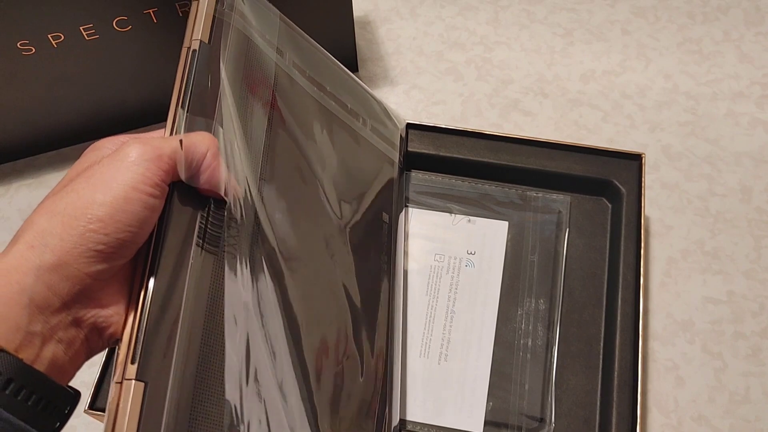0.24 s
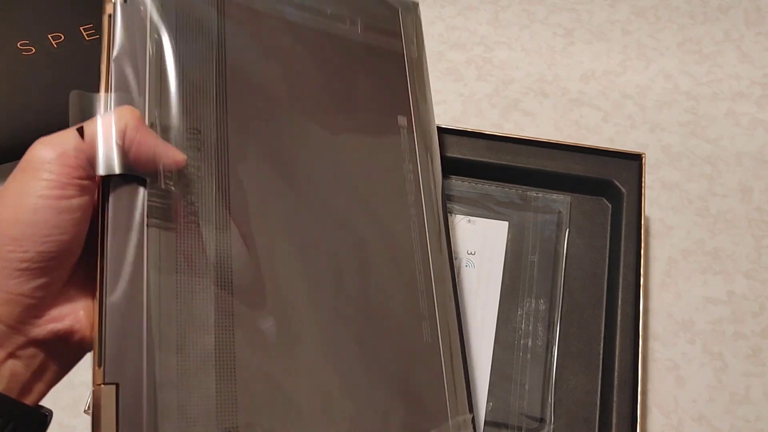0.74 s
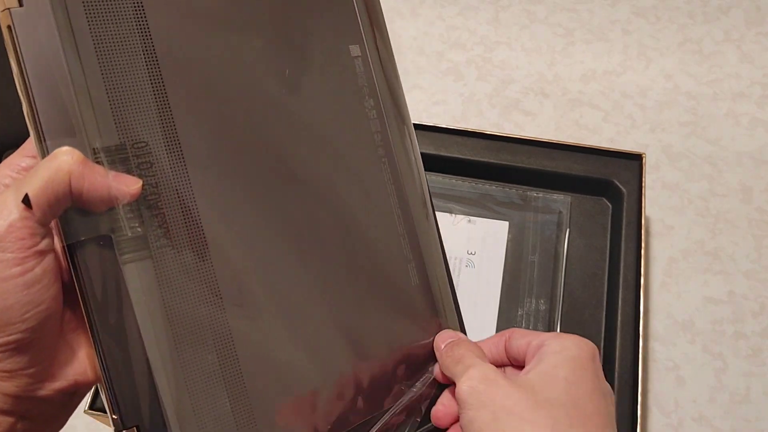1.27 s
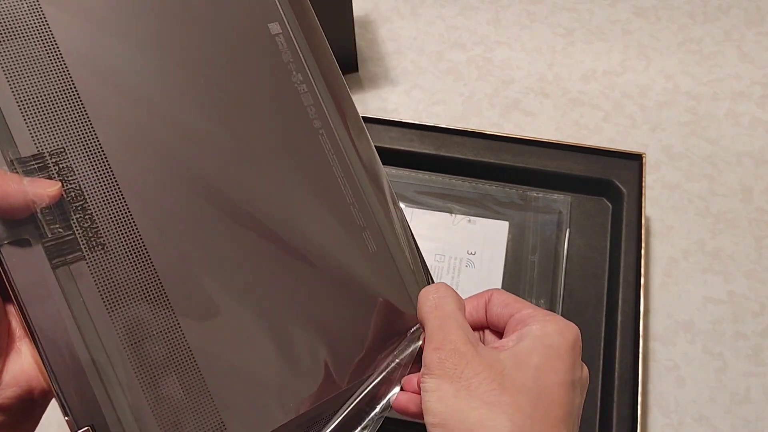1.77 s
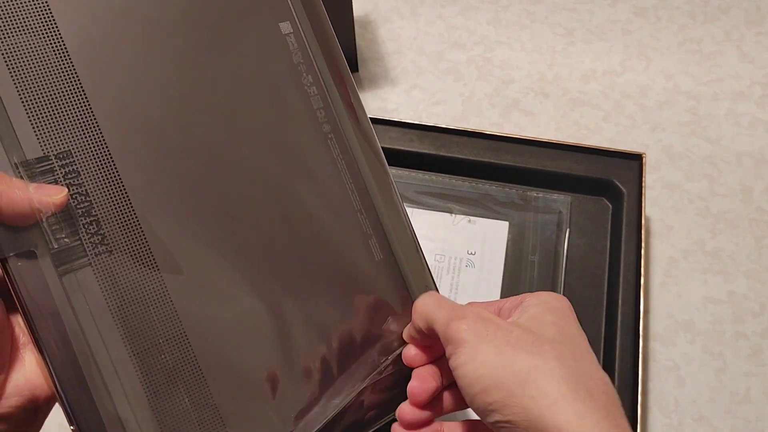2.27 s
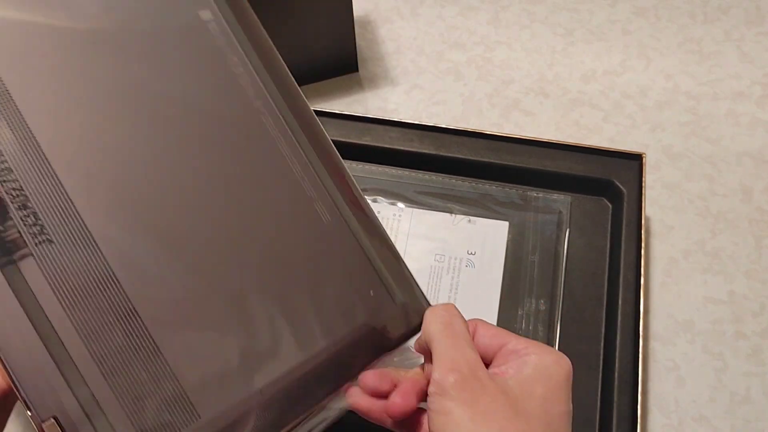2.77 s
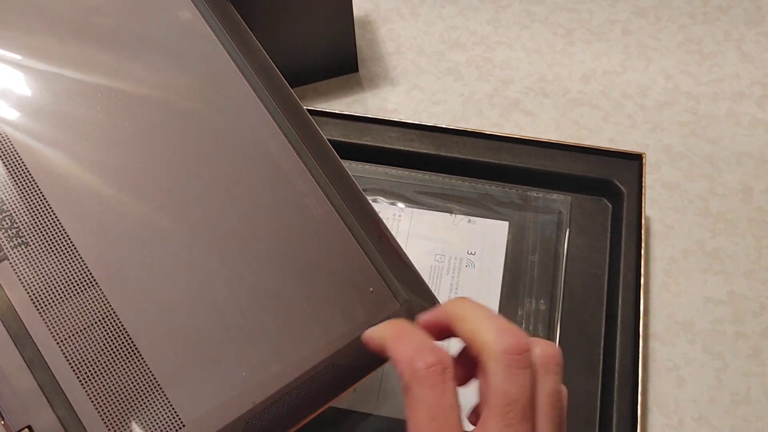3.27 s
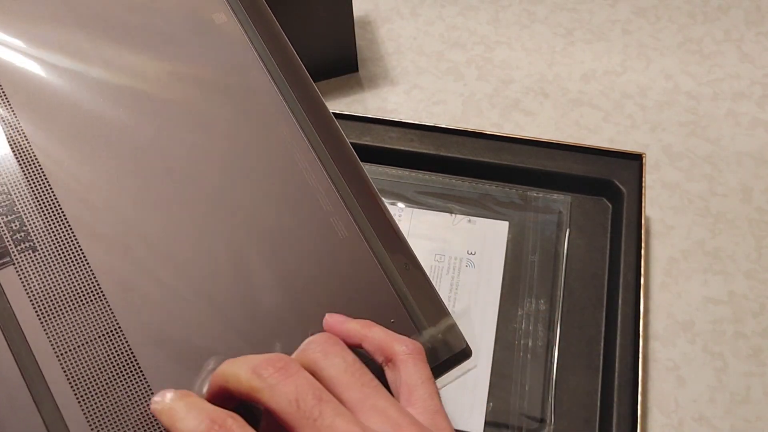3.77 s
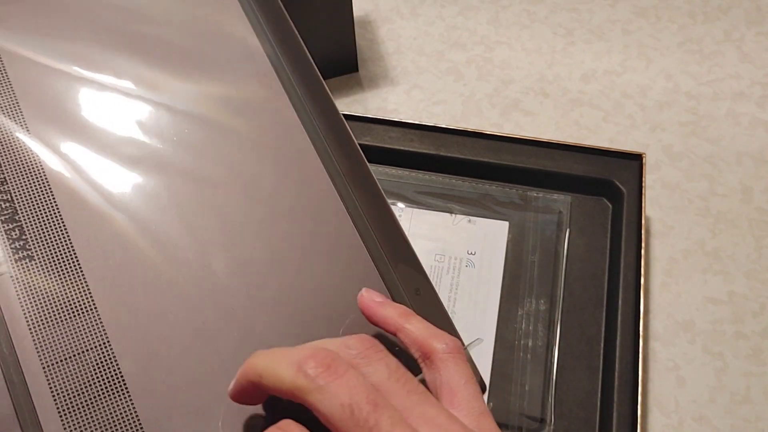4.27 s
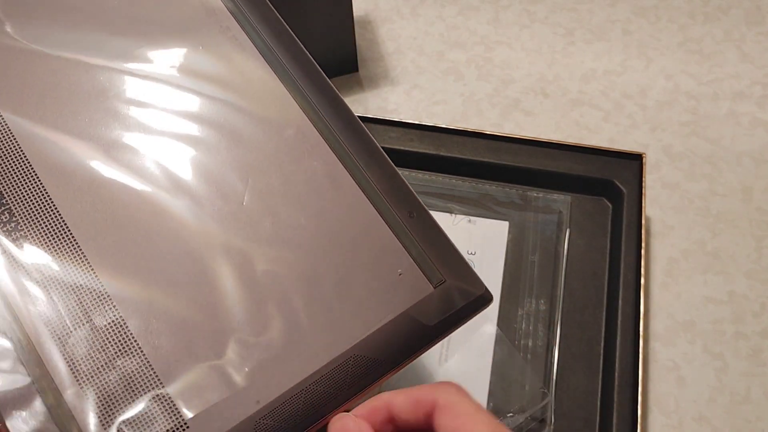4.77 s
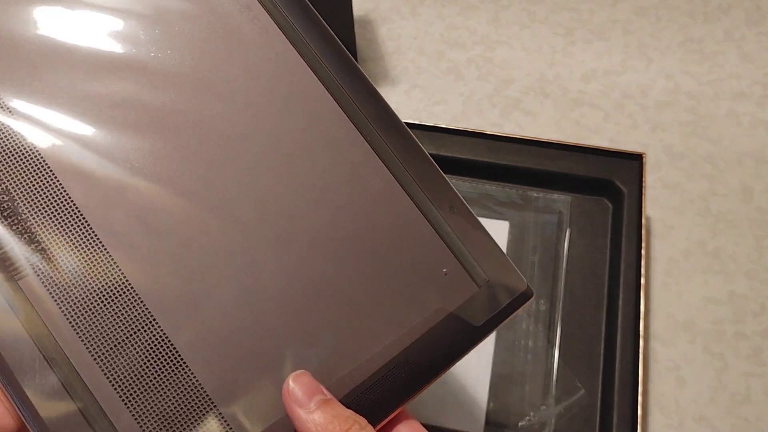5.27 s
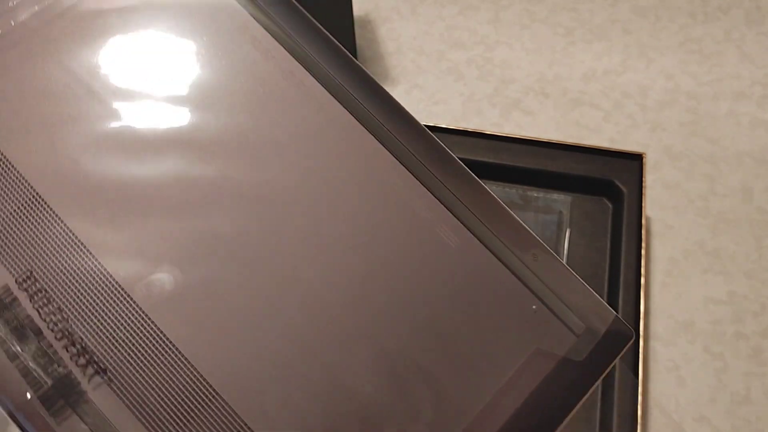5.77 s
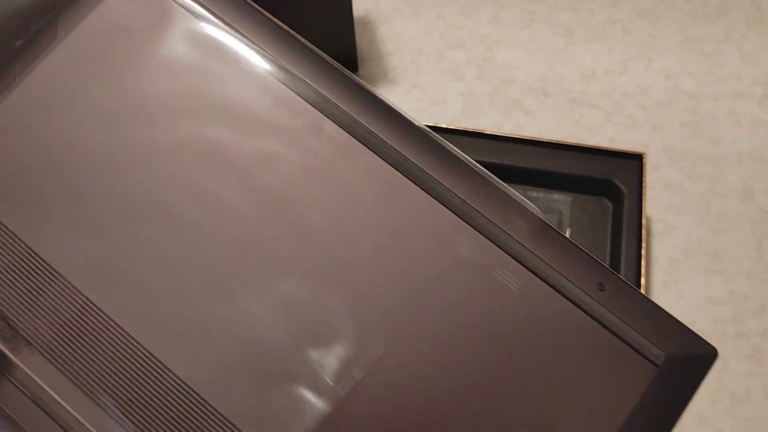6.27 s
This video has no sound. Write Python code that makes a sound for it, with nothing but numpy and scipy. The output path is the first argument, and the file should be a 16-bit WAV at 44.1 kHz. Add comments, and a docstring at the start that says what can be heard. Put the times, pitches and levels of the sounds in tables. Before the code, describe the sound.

Crisp plastic creases snap in tiny click clusters, some bright and papery, others lower and popping. The first second is busiest, then there is a near-silent gap before scattered crackles build again. Fingertips bump the panel dully, most often in the later middle. A last burst of film rustle ends it. Close stereo microphone, short indoor reflections, faint subdued background hiss.

```python
"""Thin plastic film, peeled and slid off a flat panel held over a desk, close to a camera's two microphones.
Its creases snap over as short clusters of clicks, each with its own ring; between them it rustles in fine
grains. Fingers tap the panel, ringing its modes, and three of the biggest snaps each push the air once. A small
dry room answers with desk echoes and a diffuse tail; noise suppression turns down the quiet background."""
import sys
import numpy as np
from scipy import signal
from scipy.fft import rfft, irfft, next_fast_len
from scipy.io import wavfile
from scipy.ndimage import uniform_filter1d, map_coordinates

SR = 44100
rng = np.random.default_rng(int(sys.argv[2]) if len(sys.argv) > 2 else 0)


def file_out(sig):
    """Save sig as 16-bit WAV at sys.argv[1]."""
    # one column per channel
    cols = np.atleast_2d(sig).T
    # limit, then scale
    lim = np.clip(cols, -1, 1)
    pcm = np.round(lim * 32767).astype(np.int16)
    wavfile.write(sys.argv[1], SR, pcm)


N = 287973  # length in samples

# The hand sliding the film in strokes, levels ahead of the room:
# [t/s, length/s, rustle level/dB, slack-sheet flutter level/dB]
STROKES = [(0, .13, -34, -55), (0.191, 0.48, -57, -59), (0.544, 0.19, -54, -67.5),
           (0.951, 0.16, -66, -81.5), (1.486, 0.086, -60.5, -65), (1.75, 0.16, -50.5, -65.5),
           (2.383, 0.22, -51.5, -60.5), (2.827, 0.0083, -38, -50), (2.933, 0.37, -59.5, -57.5),
           (3.553, 0.056, -49, -64.5), (4.464, 0.46, -62.5, -55.5), (4.7, 0.45, -58, -65.5),
           (5.02, 0.2, -48, -58), (5.308, 0.42, -52, -63.5), (5.921, 0.043, -55, -61.5),
           (6.197, 0.11, -35.5, -51), (6.358, 0.059, -45, -56), (6.447, 0.033, -36, -74)]
# Creases snapping over; the thump of the slack sheet is relative to the crack:
# [t/s, strength level/dB, thump level/dB, ring f/Hz]
SNAPS = [(0.0064, -6.5, -12.5, 4540), (0.0659, 0, -1.5, 5540), (0.119, -5, -18.5, 8400),
         (0.1293, 4.5, -1, 1980), (0.1963, -3.5, -7.5, 4130), (0.2618, 1.5, -20, 4930),
         (0.3267, -4.5, -1, 5300), (0.356, -15.5, -22, 3770), (0.5239, -9, -6.5, 1880),
         (0.5509, -4, -21, 1450), (0.618, -0.5, 2, 1190), (0.6773, -10.5, 5.5, 6800),
         (0.8145, 2, -7.5, 1247), (1.484, -24, -7.5, 6650), (1.7408, -10.5, -11, 3120),
         (1.7596, -11.5, -16, 4500), (1.7892, -7.5, -26, 2840), (1.8033, -20, -18, 2900),
         (1.8133, -12, -14, 7000), (1.8817, -9.5, 0, 2300), (1.9592, -8.5, -17, 1050),
         (1.9811, -11, 5, 6500), (2.002, -9.5, -3, 6800), (2.068, -10.5, -3, 2000),
         (2.3651, -10, -3.5, 1460), (2.4115, -14.5, -1, 3500), (2.4427, -10.5, -10.5, 3300),
         (2.4557, -8, -2.5, 4300), (2.525, -15.5, 1.5, 6100), (2.5453, -15.5, 2, 4000),
         (2.6578, -12.5, -16, 3040), (2.6938, -8.5, -5.5, 1960), (2.7229, -1, -9, 3700),
         (2.7404, 1.5, 5, 4000), (2.749, 0.5, -3.5, 3000), (2.898, -16, 19.5, 6100), (2.913, 2, 6.5, 2600),
         (3.059, -10, 3.5, 3940), (3.1536, 0, 5, 1810), (3.195, -13.5, -14.5, 3700),
         (3.2637, -15.5, 15, 3800), (3.489, -17, 10, 1470), (3.5187, -13.5, -19.5, 3580),
         (3.93, -19.5, 7.5, 2720), (4.149, -19.5, 13.5, 2620), (4.6923, -14, 1.5, 3100),
         (4.88, -21.5, 4, 3660), (5.041, -9.5, 6.5, 4550), (5.136, -19, 11, 6500), (5.158, -3.5, 0, 1270),
         (5.219, -15, 7.5, 7300), (5.2691, -15, -3, 3840), (5.3937, -6.5, -2.5, 3500),
         (5.4356, -16.5, -2, 3340), (5.445, -12.5, -1.5, 3900), (5.502, -10.5, -18.5, 5400),
         (5.52, -10.5, -1, 5470), (5.569, -5, -0.5, 3700), (5.593, -1, 0, 2610), (5.6084, 3, 2.5, 3000),
         (5.7174, -10, -11.5, 2200), (5.9787, -16.5, -0.5, 2400), (6.153, -13, -30, 5440),
         (6.191, -0.5, -11, 3015), (6.23, -9.5, -8.5, 5910), (6.4711, 4.5, -18, 2460)]
# Fingers pressing and tapping the panel through the film: [t/s, strength level/dB, ring f/Hz]
TAPS = [(0.128, 8.5, 633), (0.951, -20.5, 741), (1.184, -13, 872), (1.181, -9, 420), (2.327, -7.5, 480),
        (2.972, -0.5, 500), (3.385, -6.5, 596), (3.549, -14.5, 1963), (3.616, -10.5, 1386),
        (3.811, -12.5, 2766), (3.841, -12.5, 1321), (3.874, -15, 1292), (4.025, -11.5, 479),
        (4.049, -7.5, 485), (4.088, -14, 1260), (4.283, -9, 1209), (4.291, -6, 333.5),
        (4.4159, -12.5, 2550), (4.459, -9, 1360), (4.491, -14.5, 749), (4.5456, -13, 2380),
        (4.583, -7, 532), (4.617, 1, 450), (4.682, -8.5, 337), (4.799, -7.5, 316), (4.9, -8, 258),
        (6.12, -10.5, 1900)]
# Low pushes of air from the biggest snaps, peak ahead of the room: [t/s, level/dB]
THUDS = [(2.741, -31.5), (5.157, -32), (6.471, -27)]
# Colour of the film as the microphones hear it: [f/Hz, relative level/dB]
FILM_COLOUR = [(410, -42.5), (700, -1.5), (1440, -1.5), (2080, 0.5), (4900, -0.5), (6900, 1), (7800, -6),
               (10000, 0.5), (15700, -7.5), (16050, -36.5)]
# Low resonances of the slack sheet and panel: [f/Hz, width/Hz, level/dB]
SHEET_MODES = [(322.6, 102, 1.5), (510, 223, 1.5), (819, 680, -3.5)]
# Resonances of the tapped panel: [f/Hz, width/Hz, level/dB]
PANEL_MODES = [(784, 36, 10.5), (1450, 99, 13), (2150, 1100, 4.5), (2900, 150, 6.5)]
# Colour of the background at the microphones: [f/Hz, relative level/dB]
BACKGROUND_COLOUR = [(20, -31.5), (146, -15), (738, -16.5), (1440, -18), (8180, -27.5), (15300, -21),
                     (16300, -66)]
# Colour difference between the two microphone ports: [f/Hz, left-minus-right level/dB]
PORT_LEAN = [(100, -1), (700, 4), (8000, -1)]

# Slopes before, during and after a stroke; each layer scales them by its own steepness
RISE_DB_PER_S, SAG_DB_PER_S, FALL_DB_PER_S = 451, 16, 236.5
RUSTLE_STEEPNESS, FLUTTER_STEEPNESS = 0.88, 0.5  # the slack sheet follows more gently
REST_DB, REST_FLUTTER_DB = -80.5, -72  # the held film never lies quite still

# Top end of a crease ringing at 10 kHz; larger creases ring lower and are softer, stronger snaps are brighter
EDGE_DB, EDGE_DB_PER_OCTAVE, EDGE_DB_PER_DB = 10, -6, 0.24
LEAD_S, SWELL_S = 0.006, 0.002  # creak before a crease or tap lets go; from then to its central click
THUD_S = 0.00057  # time scale of the push

ROOM_T60_S = 0.35
SPAN = 16384  # samples kept for a piece with its tail
BURST = 4096  # samples in one dry piece
TOP_HZ = 16800  # band limit


def amp(db):
    """Gain of a level in dB."""
    return 10 ** (np.asarray(db) / 20)


def unit(x):
    """x at rms 1."""
    return x / np.sqrt(np.mean(x ** 2) + 1e-20)


def along(points, hz):
    """Values between (f/Hz, value) points on a log frequency axis."""
    f, v = np.transpose(points)
    return np.interp(np.log(hz + 1), np.log(f + 1), v)


def causal(gain):
    """Minimum-phase response with this gain: it rings only after the blow."""
    cepstrum = irfft(np.log(np.maximum(gain, 1e-6)))
    half = cepstrum.shape[-1] // 2
    cepstrum[..., 1:half] *= 2
    cepstrum[..., half + 1:] = 0
    return np.exp(rfft(cepstrum))


def mode(f, hz, width):
    """One resonance, with gain 1 at its centre."""
    return 1j * f * width / (hz * hz - f * f + 1j * f * width)


def sheet(f):
    """The low resonances of the slack sheet, alternating in sign."""
    return sum((-1) ** k * amp(db) * mode(f, hz, width) for k, (hz, width, db) in enumerate(SHEET_MODES))


def filtered(x, response):
    """x through a complex response of frequency."""
    m = next_fast_len(N + SR // 2)
    return irfft(rfft(x, m) * response(np.fft.rfftfreq(m, 1 / SR)), m)[..., :N]


def heard(pieces, starts, pan_db, desk_db, room_db):
    """Pieces placed in the room, each with its own desk echoes and diffuse tail at each microphone."""
    f = np.fft.rfftfreq(SPAN, 1 / SR)
    shape = (len(pieces), 2, SPAN // 2)
    age = np.arange(SPAN // 2) / SR
    tail = rng.standard_normal(shape) * amp(-60 * age / ROOM_T60_S)
    # near surfaces answer first and loudest
    tail = tail * (1 + 1.8 * np.exp(-age / 0.021)) * (1 - np.exp(-age / 0.0039))
    tail = amp(room_db) * tail / np.linalg.norm(tail, axis=2, keepdims=True)
    # desk, box and panel give a few sharp echoes
    sparse = rng.random(shape) < 900 / SR
    tail += amp(desk_db - 60 * age / 0.023) * sparse * rng.standard_normal(shape)
    delay_s = np.array([[0], [0.00015]])  # the sound reaches the left port first
    direct = np.exp(-2j * np.pi * f * delay_s)
    dull = 1 / (1 + 1j * f / 9000)  # soft furnishings swallow the top
    walls = rfft(tail, SPAN) * dull
    wet = irfft(rfft(pieces, SPAN)[:, None] * (direct + walls), SPAN)
    # the room lifts all pieces alike
    gain = np.linalg.norm(wet, axis=(1, 2)) / np.linalg.norm(pieces, axis=1)
    wet = wet * (np.median(gain) / gain)[:, None, None]
    wet = wet * amp([[pan_db / 2], [-pan_db / 2]])
    out = np.zeros((2, N + SPAN))
    for start, piece in zip(starts, wet):
        out[:, start:start + SPAN] += piece
    return out[:, :N]


def stroked(db, rest_db, steepness):
    """Gain over time: each stroke swells, sags while it lasts and dies away, over a resting level."""
    s, length = np.transpose(STROKES)[:2, :, None]
    age = np.arange(N) / SR - s
    drop_db = RISE_DB_PER_S * np.maximum(-age, 0)
    drop_db += SAG_DB_PER_S * np.clip(age, 0, length)
    drop_db += FALL_DB_PER_S * np.maximum(age - length, 0)
    strokes = amp(db[:, None] - steepness * drop_db)
    return np.sqrt(amp(rest_db) ** 2 + np.sum(strokes ** 2, 0))


def rustle():
    """Sliding film ticks in clumps of tiny grains over a faint hiss; the slack sheet flutters."""
    rustle_db, flutter_db = np.transpose(STROKES)[2:]
    t = np.arange(N) / SR
    # creases of five sizes, each busy at its own moments; row 0 of the grains drives the sheet
    rings_hz = 1100 * 1.6 ** np.arange(5)[:, None]
    knots = int(N * 25 / SR) + 4  # 25 random points per second, smoothly joined
    clump = np.array([map_coordinates(rng.standard_normal(knots), [t * 25]) for _ in range(6)])
    grains = (rng.random((6, N)) < 220 / SR) * rng.laplace(size=(6, N))
    grains = unit(grains * amp(3 * clump))

    rubbed = grains[1:] + 0.33 * rng.standard_normal((5, N))
    creases = filtered(rubbed, lambda f: mode(f, rings_hz, 0.75 * rings_hz)).sum(0)
    ticks = unit(filtered(creases, lambda f: causal(amp(along(FILM_COLOUR, f))) * mode(f, 4400, 12000)))

    shaken = grains[0] + 0.69 * rng.standard_normal(N)
    flaps = unit(filtered(shaken, lambda f: sheet(f) ** 2))

    x = ticks * stroked(rustle_db, REST_DB, RUSTLE_STEEPNESS)
    x = x + flaps * stroked(flutter_db, REST_FLUTTER_DB, FLUTTER_STEEPNESS)
    pieces = np.pad(x, (0, -N % BURST)).reshape(-1, BURST)
    return heard(pieces, BURST * np.arange(len(pieces)), pan_db=0.0, desk_db=3.5, room_db=3.0)


def background():
    """Steady room air and microphone hiss, partly shared by the ports in the bass."""
    air, left, right = rng.standard_normal((3, N))
    shared = filtered(air, lambda f: 1.8 / (1 + (f / 700) ** 2))
    pair = np.array([left + shared, right + shared])
    coloured = filtered(pair, lambda f: amp(along(BACKGROUND_COLOUR, f)))
    return amp(-57.0) * unit(coloured)  # rms ahead of the noise suppression


def clusters(voice, rate, t60, fizz):
    """A creak swells into random clicks, dying away; each burst has the colour and energy of its voice."""
    t = np.arange(BURST // 2) / SR - LEAD_S - SWELL_S
    draw = rng.random((len(voice), 3, len(t)))
    clicks = (draw[:, 0] < rate / SR) * (2 * draw[:, 1] - 1)
    clicks = clicks + fizz * (2 * draw[:, 2] - 1)  # continuous noise between the clicks
    clicks[:, round(LEAD_S * SR + SWELL_S * SR)] = 0.7  # one certain click at the centre
    clicks = clicks * amp(np.where(t < 0, -6 + 3000 * t, -60 * t / t60))
    bursts = rfft(clicks, BURST) * voice
    energy_match = np.linalg.norm(voice, axis=1, keepdims=True) / np.linalg.norm(bursts, axis=1, keepdims=True)
    return irfft(bursts * energy_match)


def snaps():
    """A crease lets go in a few clicks within milliseconds; its size sets the ring."""
    s, db, thump_db, hz = np.transpose(SNAPS)[..., None]
    f = np.fft.rfftfreq(BURST, 1 / SR)
    edge_db = EDGE_DB + EDGE_DB_PER_OCTAVE * np.log2(10000 / hz) + EDGE_DB_PER_DB * db
    # 0 at the ring, 1 at 10 kHz: a soft crease fades above its ring
    above = np.clip(np.log((f + 1) / hz) / np.log(10000 / hz), 0, 1)
    crack = causal(amp(along(FILM_COLOUR, f) + edge_db * above))
    crack = crack * (1.28 + 1.42 * mode(f, hz, 0.22 * hz))
    voice = amp(db) * (crack + amp(thump_db) * sheet(f))
    bursts = clusters(voice, rate=3500, t60=0.019, fizz=0.036)
    starts = np.round((s[:, 0] - LEAD_S) * SR).astype(int)
    return heard(bursts, starts, pan_db=0.5, desk_db=-2, room_db=4)


def taps():
    """A fingertip is soft: a dull push rings the panel's modes at new strengths, loudest near one pitch."""
    s, db, hz = np.transpose(TAPS)[..., None]
    f = np.fft.rfftfreq(BURST, 1 / SR)
    spot_db = rng.normal(0, 2, (len(s), len(PANEL_MODES), 1))  # each tap lands on another spot
    panel = 0
    for k, (centre, width, level) in enumerate(PANEL_MODES):
        strength = amp(level + spot_db[:, k]) * np.minimum(1, hz / centre)  # weaker above the tap's pitch
        panel = panel + (-1) ** k * strength * mode(f, centre, width)
    ring = mode(f, hz, 0.08 * hz + 90)
    film = causal(amp(along(FILM_COLOUR, f)))
    voice = amp(db) * (3.2 * ring + 0.75 * panel + 0.48 * sheet(f) + 0.011 * film)
    bursts = clusters(voice, rate=570, t60=0.029, fizz=0.011)
    starts = np.round((s[:, 0] - LEAD_S) * SR).astype(int)
    return heard(bursts, starts, pan_db=3.0, desk_db=-9, room_db=0)


def thuds():
    """A big snap pushes the air once: one low push that does not ring."""
    s, db = np.transpose(THUDS)[..., None]
    u = np.arange(BURST // 2) / SR / THUD_S
    push = u * (6 - 6 * u + u * u) * np.exp(-u)  # peaks near 1
    return heard(amp(db) * push, np.round(s[:, 0] * SR).astype(int), pan_db=9, desk_db=-21, room_db=-11)


def suppressed(x):
    """Noise suppression: whatever sinks towards the steady background is turned down."""
    z = signal.stft(x, nperseg=512)[2]
    power = np.mean(np.abs(z) ** 2, 0)  # both ports together
    power = uniform_filter1d(power, 9, 0)  # smoothed over frequency
    power = np.abs(uniform_filter1d(power, 5, 1))  # and over time
    steady = np.percentile(power, 5, axis=1, keepdims=True)
    keep = power / (power + amp(26.5) * steady)  # one half at about 21 times the steady power
    return signal.istft(z * (0.26 + 0.92 * keep), nperseg=512)[1][:, :N]


def scene():
    """Snaps, taps, thuds, rustle and background together at the two microphones."""
    return snaps() + taps() + thuds() + rustle() + background()


def record(dry):
    """Noise is suppressed; the ports differ a little in colour; nothing is kept above the band limit."""
    def ports(hz):
        return amp(np.outer([0.5, -0.5], along(PORT_LEAN, hz))) * (hz < TOP_HZ)
    return filtered(suppressed(dry), ports)


dry = scene()
out = record(dry)
file_out(out)
```